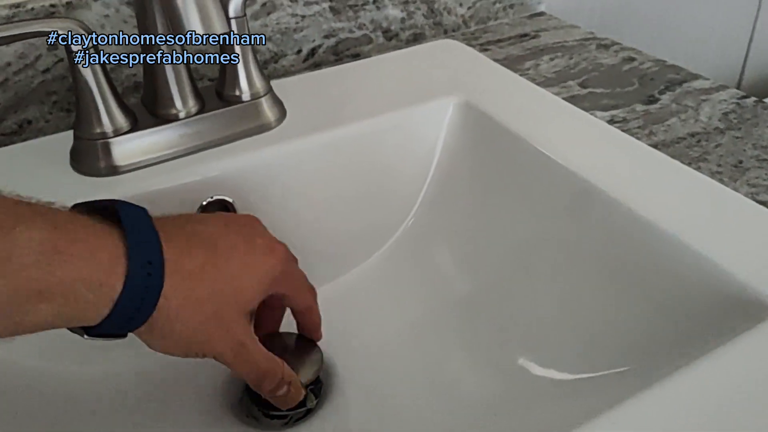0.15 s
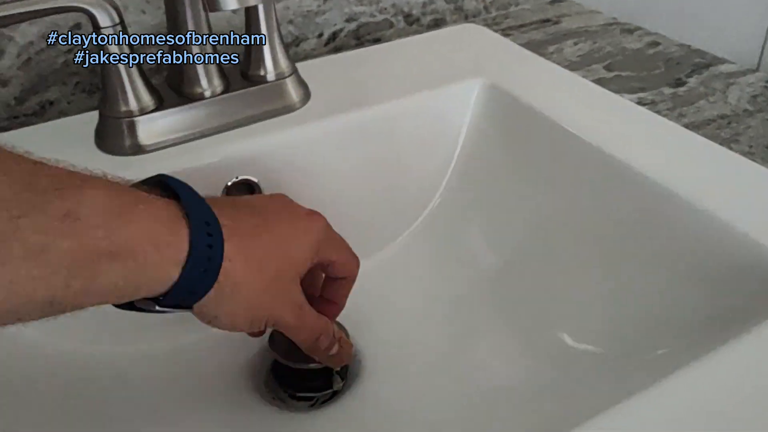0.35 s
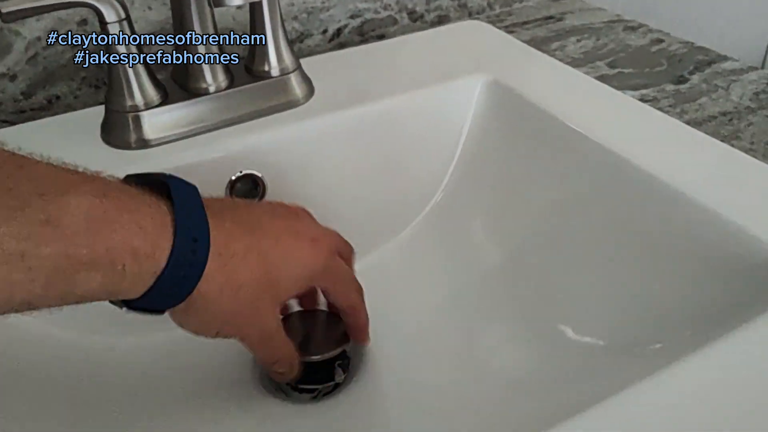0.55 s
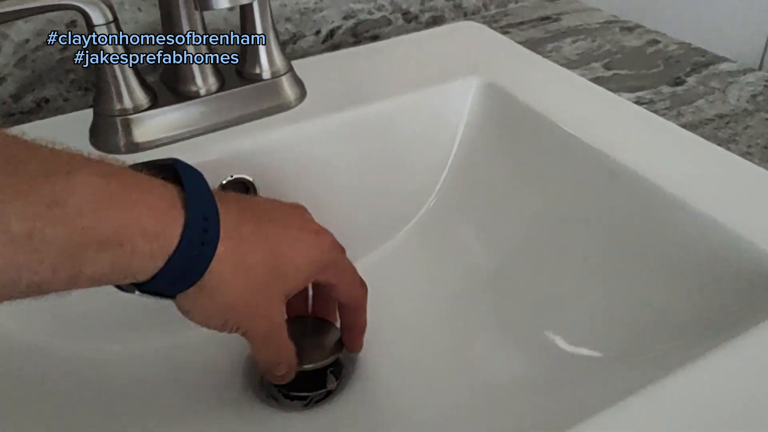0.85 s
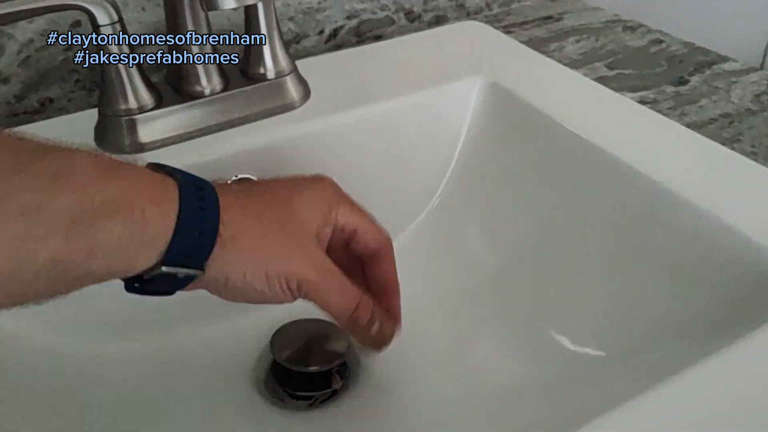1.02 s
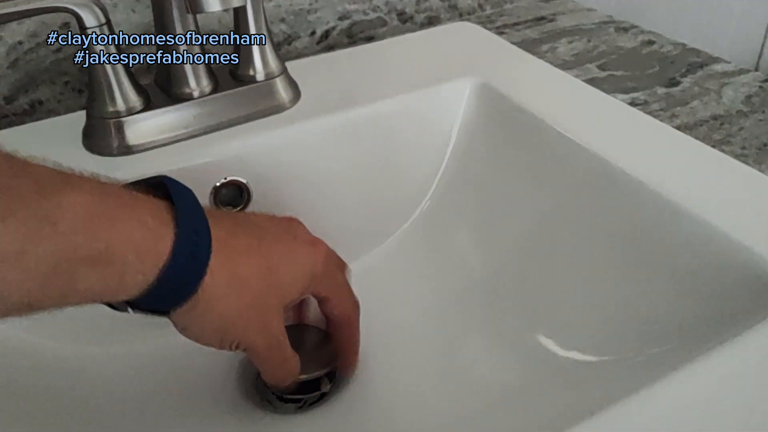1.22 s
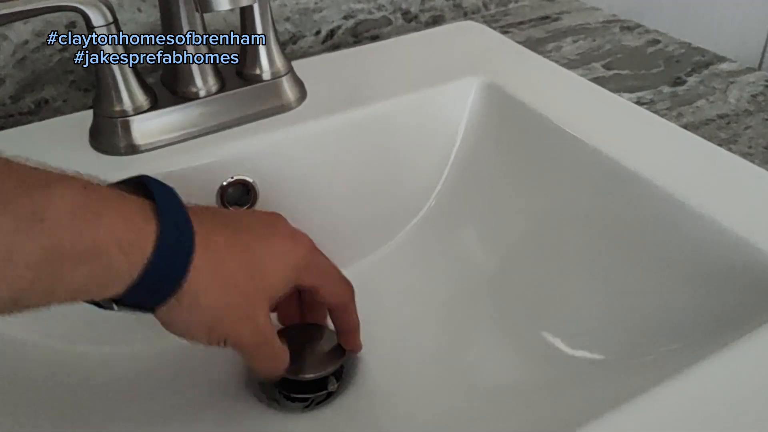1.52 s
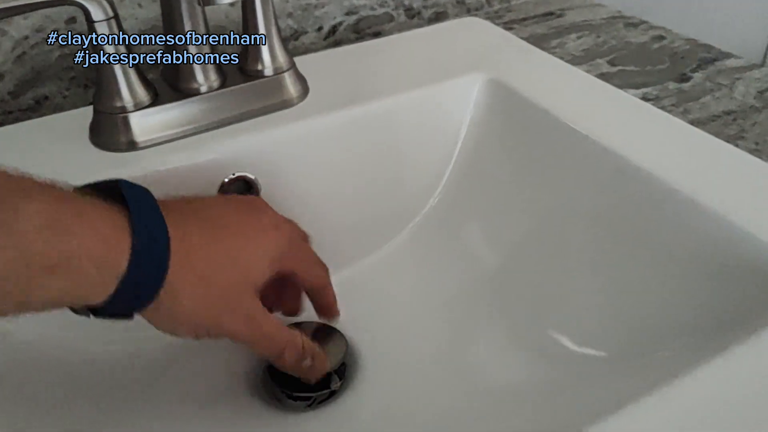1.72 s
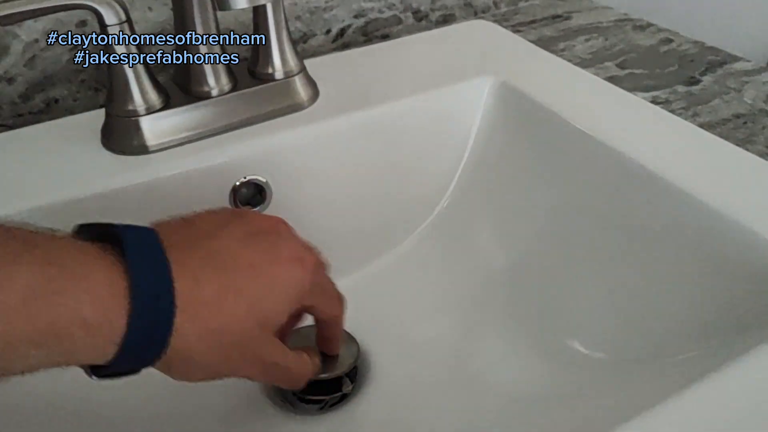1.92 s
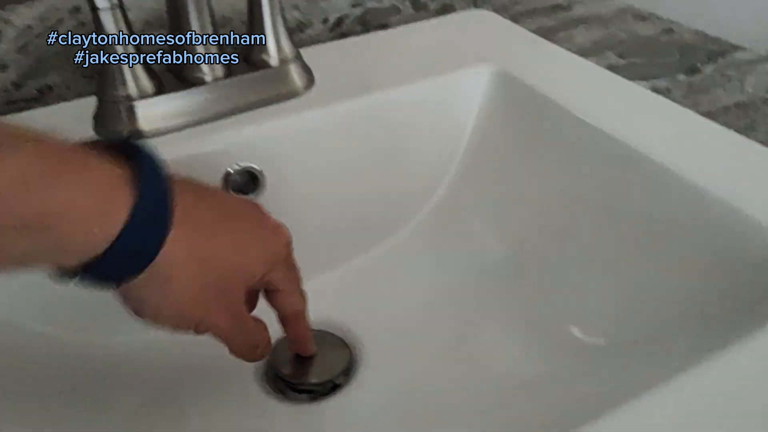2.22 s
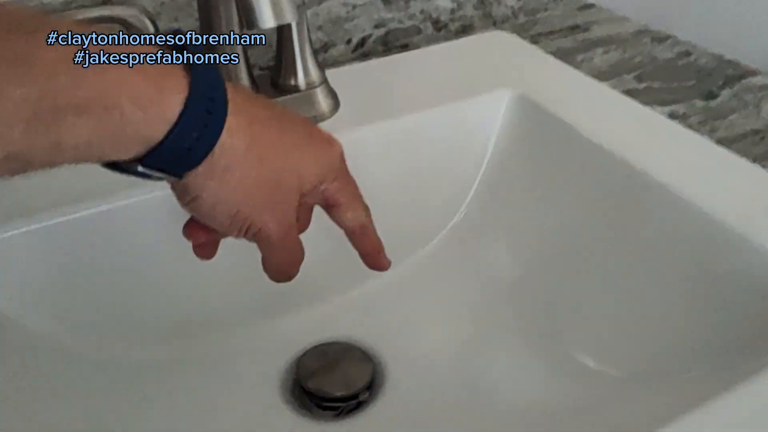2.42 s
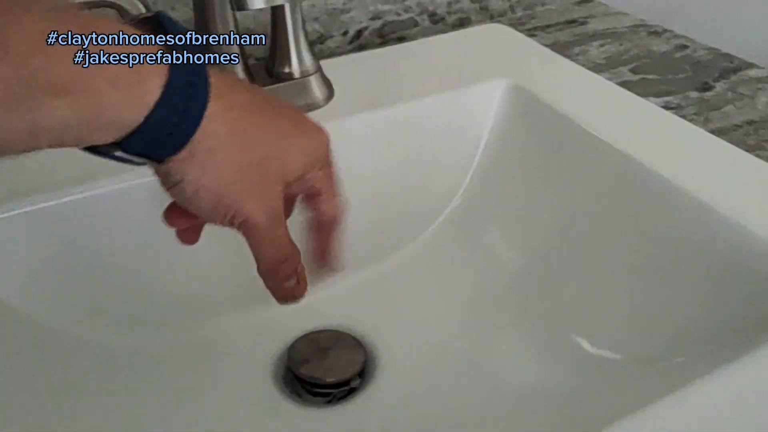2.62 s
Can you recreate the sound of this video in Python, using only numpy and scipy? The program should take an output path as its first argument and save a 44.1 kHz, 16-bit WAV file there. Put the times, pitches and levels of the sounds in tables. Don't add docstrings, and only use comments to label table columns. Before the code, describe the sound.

A metal drain stopper is handled in a ceramic sink: faint fingertip rubs first, then two hollow knocks booming in the pipe, then crisp latch snaps down and up, close microphone, bare bathroom, tails cut short.

```python
import sys
import numpy as np
from scipy import signal
from scipy.io import wavfile
from scipy.ndimage import uniform_filter1d

SR = 44100
rng = np.random.default_rng(int(sys.argv[2]) if len(sys.argv) > 2 else 0)


def generate_wav(signal):
    frames = np.transpose(np.atleast_2d(signal))
    scaled = np.clip(frames, -1, 1) * 32767
    pcm = np.round(scaled).astype(np.int16)
    wavfile.write(sys.argv[1], SR, pcm)


def volts(x):
    e = np.asarray(x, float) / 20
    return 10 ** e


N = 121275
T = np.arange(N) / SR


def rms_one(x):
    return x / np.sqrt(np.mean(x ** 2) + 1e-20)


def at_hz(points, hz):
    table = np.array(points)
    return np.interp(np.log(hz), np.log(table[:, 0]), table[:, 1])


def thin_out(x, hz):
    return signal.sosfilt(signal.butter(2, hz, "high", fs=SR, output="sos"), x)


def white_pairs():
    return rng.standard_normal((2, 2, N))


def drift(rate):
    r = np.exp(-80 * np.pi * rate / SR)
    steps = rng.standard_normal(N // 40 + 2002)
    slow = signal.lfilter([1], [1, -2 * r, r * r], steps)[2000:]
    return np.interp(np.arange(N) / 40, np.arange(len(slow)), rms_one(slow))


def swell(s, rise, fall):
    growing = .5 * ((T - s) / rise) ** 2
    fading = np.hypot(1, (T - s) / fall) - 1
    return np.exp(-np.where(T < s, growing, fading))


def ring(clicks, hz, t60):
    r, w = volts(-60 / (t60 * SR)), 2 * np.pi * hz / SR
    return signal.lfilter([0, np.sin(w)], [1, -2 * r * np.cos(w), r * r], clicks + 1e-18)


def resonate(x, hz, width_hz):
    return rms_one(ring(x, hz, 2.2 / width_hz))


# f/Hz, likeness (1 = same)
LIKENESS = [(100, 0.91), (500, 0.19), (1500, 0.043), (5000, 0.12), (12000, 0.064)]
# f/Hz, left minus right level/dB
LEAN = [(300, -1.5), (700, .8), (2000, -.5), (5000, -2), (9500, -5), (14000, 1.4)]


def lean_gain(hz):
    return volts(at_hz(LEAN, hz) / 2 * np.array([[1], [-1]]))


def bands(white, spectrum, patchy_db=0., decay=None):
    out, edges = 0, 22 * 2 ** np.arange(0, 9.6, .5)
    for k, (low, high) in enumerate(zip(edges, edges[1:])):
        band = signal.butter(2, [low, high], "band", fs=SR, output="sos")
        mid, side = signal.sosfilt(band, white[k % 2])
        hz = np.sqrt(low * high)
        alike = np.clip(at_hz(LIKENESS, hz), -1, 1)
        fade = -60 * T / at_hz(decay, hz) if decay else patchy_db * drift(30.4)
        gain = volts(at_hz(spectrum, hz) + fade) * lean_gain(hz)
        out = out + gain * (np.sqrt(1 + alike) * mid + np.sqrt(1 - alike) * side * [[1], [-1]])
    return rms_one(out)


def struck(contacts, modes, most_cycles):
    s, db = np.transpose(contacts)
    luck, out = rng.standard_normal((len(s), len(modes), 3)), np.zeros((2, N))
    signs = np.sign(luck[:, 0, 2])
    for k, (hz, level_db, t60) in enumerate(modes):
        clicks = np.zeros((2, N))
        for side in range(2):
            when = (s * SR).astype(int) + side * (k % 3)
            clicks[side, when] = volts(db + level_db - 4.0 + 2 * luck[:, k, side]) * (-1) ** k * signs
        soft = signal.butter(2, min(1.4 * hz, 16000), fs=SR, output="sos")
        tone = ring(clicks, hz, min(t60, most_cycles / hz))
        out += signal.sosfilt(soft, tone) * lean_gain(hz)
    return thin_out(out, 500)


# f/Hz, level/dB per Hz
AIR = [(35, -54), (60, -5.5), (163, -12), (329, 4.5), (404, -23), (566, -2), (2000, -42), (2600, -79.5),
       (4400, -120)]


def room_air():
    return volts(-72) * bands(white_pairs(), AIR, patchy_db=3.5)


# f/Hz, t60/s
ROOM_T60 = [(300, 0.55), (2000, 0.38), (5000, 0.5), (9000, 0.31), (14000, 0.28)]
# f/Hz, level/dB
ROOM_TONE = [(280, 10), (450, -3), (700, 3.5), (1000, -4.5), (1400, -2), (6000, -4), (9000, 0),
             (14000, -0.5)]


def wall_answer():
    return bands(white_pairs(), ROOM_TONE, decay=ROOM_T60) * (1 - np.exp(-(T / 0.0017) ** 2))


def bathroom(x, answer):
    return signal.fftconvolve(x[None], answer / np.sqrt(N), axes=1)[:, :N]


# t/s, level/dB
STIR = [(0, -98), (1.0, -76), (1.1, -58.5), (1.18, -58.5), (1.252, -66.5), (1.32, -45.5), (1.374, -57),
        (1.438, -44), (1.52, -57.5), (1.564, -54), (1.686, -59), (1.72, -41.5), (1.88, -69), (2.2, -79),
        (2.246, -52.5), (2.36, -60.5), (2.39, -60.5), (2.6, -75)]
# f/Hz, level/dB per Hz
STIR_TONE = [(15, -43.5), (40, -16.5), (100, -16), (260, -6.5), (408, -25), (600, -6.5), (780, -45.5),
             (1320, -120)]


def hand_rumble():
    level_db = np.interp(T, *np.transpose(STIR)) + 6.1 * drift(20)
    return volts(level_db) * bands(white_pairs(), STIR_TONE, patchy_db=4.0)


# t/s, level/dB, f/Hz
THUMPS = [(0.086, -45.5, 268.5), (1.098, -41, 218), (1.168, -34, 330), (1.302, -39, 208),
          (1.319, -45, 67.4), (1.418, -30.5, 273), (1.559, -68, 199), (1.598, -42.5, 65),
          (1.718, -40, 161.5), (1.792, -40, 210), (2.232, -39, 257), (2.249, -30, 288), (2.296, -31.5, 306),
          (2.382, -31, 273), (2.412, -38.5, 244)]


def thumps():
    cycles, rise_s = 10.6, 0.0035
    out = np.zeros(N)
    for s, db, hz in THUMPS:
        t = np.maximum(T - s, 0)
        out += volts(db - 60 * t * hz / cycles) * (1 - np.exp(-t / rise_s)) * np.sin(2 * np.pi * hz * t)
    return out


# t/s, level/dB, half length/s, f/Hz
SQUEAKS = [(1.305, -66, .012, 7150), (1.96, -68, .014, 7150), (.366, -68, .008, 2800),
           (.47, -78, .012, 2750), (.065, -76, .006, 2750), (.17, -76, .006, 2750), (.79, -83, .02, 3900),
           (.42, -82, .008, 2850), (2.0, -64, .13, 310), (.84, -78, .012, 4600), (2.0, -63, .12, 560),
           (2.1, -84, .1, 2300)]


def spring_squeaks():
    white, out = rng.standard_normal(N), np.zeros(N)
    for s, db, length_s, hz in SQUEAKS:
        tone = resonate(resonate(white, hz, 120), hz, 120)
        out += volts(db) * swell(s, length_s, length_s / 2) * tone
    return out


# t/s, peak level/dB, rise/s, fall/s, pipe share level/dB
RUBS = [(0.021, -62.5, 0.0047, 0.0027, 2.5), (0.084, -62, 0.0075, 0.014, 7.5),
        (0.171, -67.5, 0.027, .006, 7.5), (0.283, -34, 0.0075, 0.0075, -11), (0.352, -62, 0.007, 0.011, 16),
        (0.362, -58.5, 0.0022, 0.004, 10.5), (0.645, -33.5, 0.0097, 0.0088, -2.5),
        (0.749, -71.5, .002, 0.011, 16.5), (.83, -70, 0.042, 0.031, 3.5), (.949, -60, 0.021, 0.0096, -12),
        (1.046, -52, 0.013, 0.0093, 0.5), (1.107, -44.5, 0.0093, 0.0086, -9),
        (1.161, -51, 0.0077, 0.027, 4), (1.309, -59, 0.017, 0.024, 10.5), (1.376, -45, 0.015, 0.036, 3.5),
        (1.554, -58.5, 0.0016, 0.03, 24.5), (1.584, -46, 0.0053, 0.0095, 5.5),
        (1.654, -65.5, 0.057, 0.09, 5.5), (1.955, -65.5, 0.04, 0.076, 4.5),
        (2.187, -62, 0.022, 0.006, 13.5), (2.224, -36.5, 0.01, 0.0054, -4.5),
        (2.381, -33, 0.0044, 0.0064, -25.5)]
# f/Hz, level/dB per Hz
RUB_TONE = [(88, -83), (150, -32), (555, -9), (745, -16), (1290, -12), (2060, -16), (3350, -4.5),
            (7620, -10), (16000, -52.5)]
# f/Hz, width/Hz, level/dB
RUB_RINGS = [(2370, 1100, 7.5), (4420, 300, 0), (8400, 3700, 10.5)]


def rubs():
    grains_per_s, grain_db, shape = 15000, 2.5, (2, 2, N)
    hits = rng.random(shape) < grains_per_s / SR
    sizes = volts(grain_db * rng.exponential(1, shape).clip(max=3.5))
    grains = hits * sizes * rng.choice([-1, 1], shape)
    skin = bands(grains, RUB_TONE, patchy_db=-1.5)
    cap = sum(volts(db - 10.5) * resonate(skin, hz, width) for hz, width, db in RUB_RINGS)
    airy = rms_one(thin_out(thin_out(grains[0], 9600), 9600))
    skin = rms_one(skin + cap) + volts(-18) * airy
    pipe = resonate(rng.standard_normal(N), 722, 43.4)
    pipe = pipe + .5 * resonate(rng.standard_normal(N), 300, 84)
    out = np.zeros((2, N))
    for s, db, rise, fall, pipe_db in RUBS:
        out += swell(s, rise, fall) * volts(db - 6.5) * (skin + volts(pipe_db - 2.5) * pipe)
    return thin_out(out, 140)


# t/s, peak level/dB, rise/s, fall/s
SLIDES = [(1.295, -57.5, 0.0044, 0.022), (1.372, -46, .022, 0.005), (1.42, -46.5, 0.017, 0.028),
          (1.549, -61.5, 0.0012, 0.013), (1.65, -50.5, 0.026, 0.029), (2.175, -77, 0.0066, 0.048),
          (2.26, -50, .01, 0.087), (2.355, -48, .002, 0.0037)]
# f/Hz, width/Hz, level/dB
SLIDE_RINGS = [(4120, 360, 1.5), (5790, 1100, 2), (7080, 1500, 5.5), (9260, 750, -12), (12070, 900, -25.5),
               (14500, 1500, -18)]


def slides():
    white = rng.standard_normal((2, N)) * volts(1.8 * drift(60))
    grind = 0
    for hz, width, db in SLIDE_RINGS:
        grind = grind + volts(db) * resonate(resonate(white, hz, width), hz, width)
    strokes = sum(volts(db) * swell(s, rise, fall) for s, db, rise, fall in SLIDES)
    return strokes * rms_one(grind)


# t/s, level/dB, f/Hz, t60/s, choked after/s
KNOCKS = [(.475, -64.5, 733, 0.13, 0.072), (.632, -36, 717, 0.16, 0.017), (.646, -42, 750, 0.11, 0.0095),
          (.66, -49, 710, .1, 0.033), (.749, -56, 710, 0.045, .02), (1.3945, -18, 927, 0.02, 0.0038),
          (1.397, -16, 716, 0.073, 0.0098), (1.412, -41, 1049, 0.14, 0.06),
          (1.414, -32.5, 679, 0.15, 0.037), (1.6942, -10, 725.4, 0.063, 0.061),
          (1.694, -27, 1093, 0.023, 0.024), (2.184, -41, 728, 0.094, 0.012),
          (2.228, -12, 704, 0.033, 0.009), (2.243, -28.5, 643, 0.11, 0.0096),
          (2.361, -19.5, 670.5, 0.04, 0.042), (2.383, -23.5, 938, 0.025, 0.0052),
          (2.393, -23.5, 679, 0.05, .045)]


def pipe_booms():
    rise_s, choke_s = 0.0017, 0.0017
    out = np.zeros(N)
    for s, db, hz, t60, hold in KNOCKS:
        t = np.maximum(T - s, 0)
        choke = np.exp(-np.maximum(t - hold, 0) / choke_s)
        swelling = (1 - np.exp(-t / rise_s)) ** 2
        out += volts(db - 60 * t / t60) * swelling * choke * np.sin(2 * np.pi * hz * t)
    return out


# f/Hz, level/dB, t60/s
SEAT = [(967, -2, 0.013), (1667, -3, 0.0061), (2255, -6.5, 0.0089), (4010, 5.5, 0.0015), (4990, 5, 0.0042),
        (6050, 2, 0.0041), (7360, 1, 0.018), (8640, -11.5, 0.0025), (12100, -18.5, .003),
        (14700, -23.5, 0.004)]
# t/s, level/dB
TICKS = [
    (1.5785, -38.5),
    (0.81, -56),
    (0.58, -63),
]


def seat_ticks():
    return struck(TICKS, SEAT, 11.6)


# t/s, level/dB
CRACKS = [
    (1.398, -31.5),
    (1.6944, -29.5),
]


def seat_knocks():
    rattle = [(-.0022, -3), (-.0009, -2.5), (0, -8), (.0017, 10)]   # delay/s, loss/dB
    contacts = [(s + lag, db - loss) for s, db in CRACKS for lag, loss in rattle]
    return struck(contacts, SEAT, 18)


# t/s, level/dB of each contact
DOWN = [(2.2283, -19.5), (2.229, -4), (2.232, -12.5), (2.237, -58.5), (2.3815, -30), (2.3843, -20)]
# t/s, level/dB of each contact
UP = [(2.3915, -29), (2.3924, -0.5), (2.3938, -5.5), (2.395, -6)]
# f/Hz, level/dB, t60/s
LATCH_DOWN = [(1330, -27, 0.071), (2760, -31, 0.0047), (3880, -38, 0.0042), (4450, 9.5, 0.0021),
              (5420, -3.5, .005), (6540, -8.5, 0.0043), (8950, -9, 0.0082), (9450, -8.5, 0.0068),
              (14300, -45.5, 0.003)]
# f/Hz, level/dB, t60/s
LATCH_UP = [(1382, -16.5, 0.024), (1850, -10.5, 0.0066), (2490, -7, 0.0061), (3372, -2.5, 0.0076),
            (4670, -0.5, 0.0032), (6000, -3, 0.0042), (6650, -6.5, 0.0058), (8350, -6.5, 0.0067),
            (10400, -7, 0.0052), (11600, -24, 0.0022), (13900, -32, 0.0047)]


def latch():
    treble_gap = signal.butter(4, [10200, 13400], "bandstop", fs=SR, output="sos")
    return signal.sosfilt(treble_gap, struck(DOWN, LATCH_DOWN, 20)) + struck(UP, LATCH_UP, 32)


# t/s, level/dB
REBOUND = [
    (2.4985, -8),
    (2.5005, -8.5),
]


def rebound():
    return struck(REBOUND, LATCH_UP, 28)


def scene():
    snap, bounce, seat = latch(), rebound(), seat_knocks()
    boom, touch = pipe_booms(), rubs() + spring_squeaks()
    answer = wall_answer()
    to_room = volts(-0.5) * (snap + bounce).mean(0)
    to_room += volts(-9.5) * boom * (T > 1.2)
    to_room += volts(-37.5) * touch.mean(0)
    wet = bathroom(to_room, answer)
    wet += bathroom(volts(5.5) * seat.mean(0), answer * volts(-58 * T))
    background = room_air() + hand_rumble() + thumps() + wet
    hits = seat_ticks() + seat + snap
    hits += volts(-13.5) * bounce
    hits += boom * np.array([[volts(.4)], [volts(-.4)]])
    return background + touch + slides() + hits


def top_cut(x):
    return signal.sosfilt(signal.butter(12, 16450, fs=SR, output="sos"), x)


# f/Hz, level/dB
GATE = [(600, -125), (1500, -105), (5000, -90), (14000, -100)]
# f/Hz, level/dB
TREBLE = [(9800, 0.5), (10500, -5.5), (12800, -0.5), (13600, 0), (15200, 0.5), (15600, -25.5)]
# f/Hz, level/dB per Hz
HISS = [(900, 5.5), (2500, -1.5), (7000, -0.5), (15000, -25)]


def record(dry):
    hz, _, z = signal.stft(dry, SR, nperseg=1024)
    power = uniform_filter1d(np.mean(np.abs(z) ** 2, 0), size=5, axis=0)
    keep = 0.18
    power = np.maximum(power, signal.lfilter([1 - keep], [1, -keep], power))
    limit = volts(2 * at_hz(GATE, hz + 1))[:, None]
    gain = np.maximum(power ** 2 / (power ** 2 + limit ** 2), volts(-18))
    colour = volts(at_hz(TREBLE, hz + 1))[:, None]
    clean = signal.istft(z * gain * colour, SR, nperseg=1024)[1][:, :N]
    top = .8
    clean = top * np.tanh(clean / top)
    clean = signal.sosfilt(signal.butter(8, 16000, fs=SR, output="sos"), clean)
    hiss = volts(-85.5) * bands(white_pairs(), HISS, patchy_db=-1.5)
    return top_cut(clean + hiss)


dry = scene()
out = record(dry)
generate_wav(out)
```